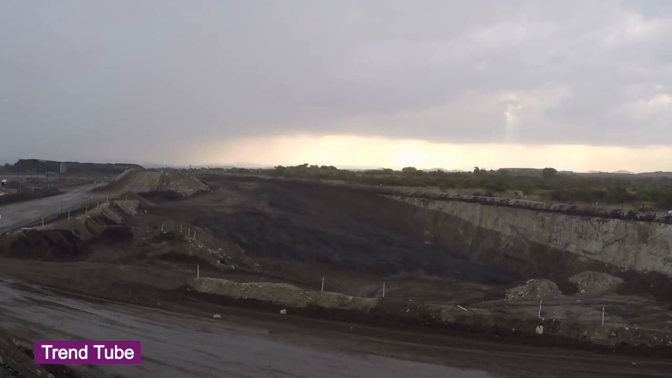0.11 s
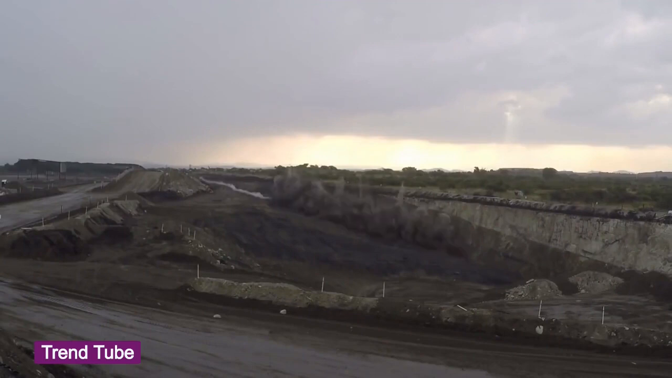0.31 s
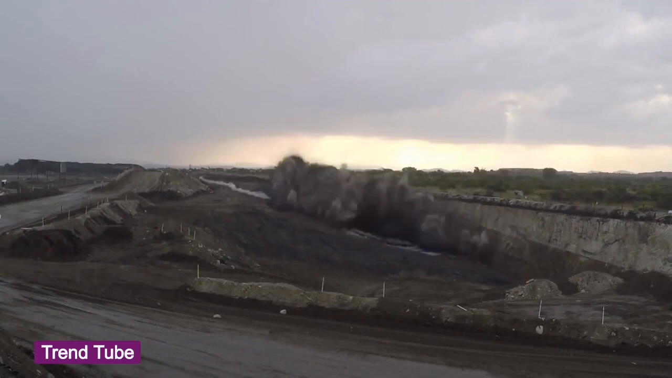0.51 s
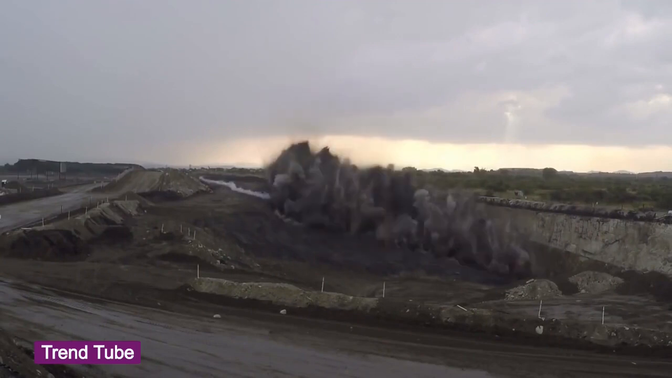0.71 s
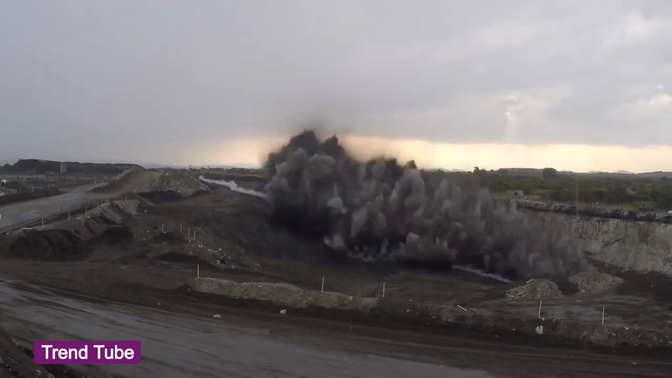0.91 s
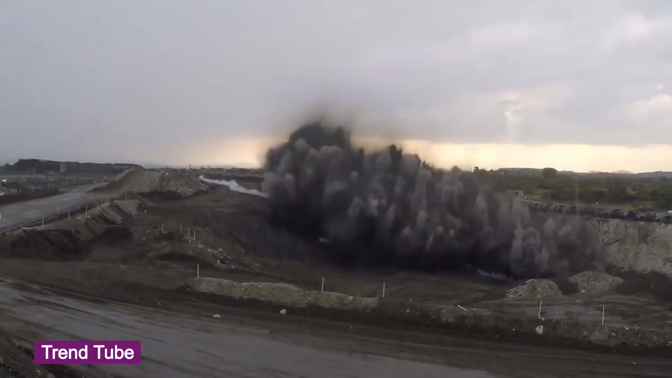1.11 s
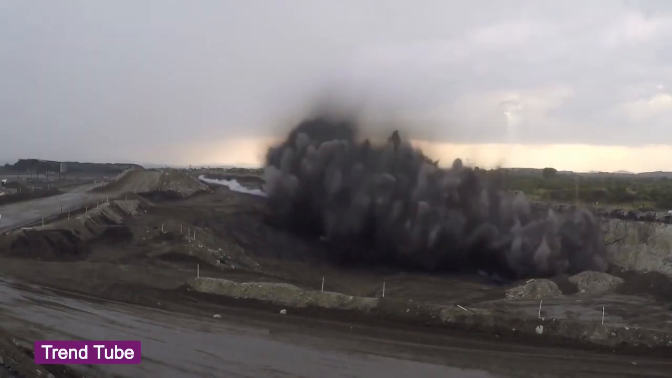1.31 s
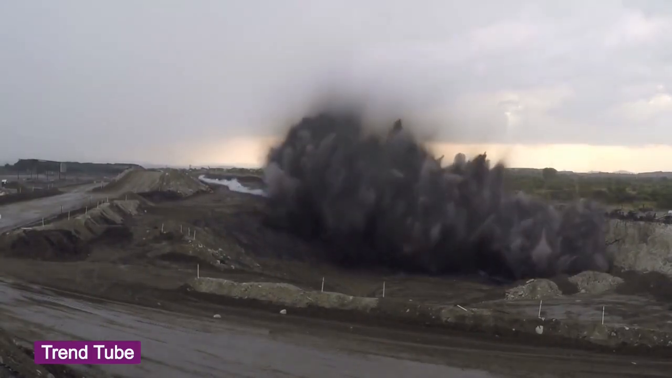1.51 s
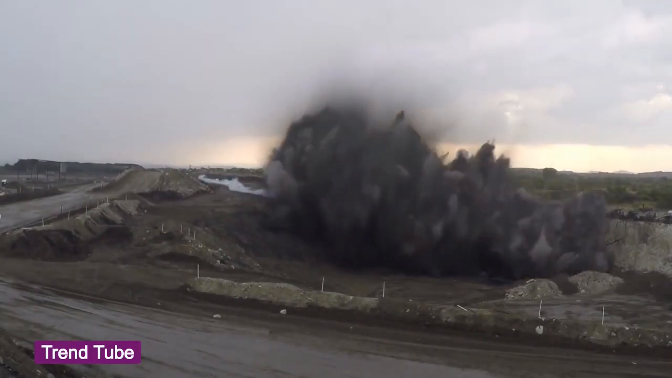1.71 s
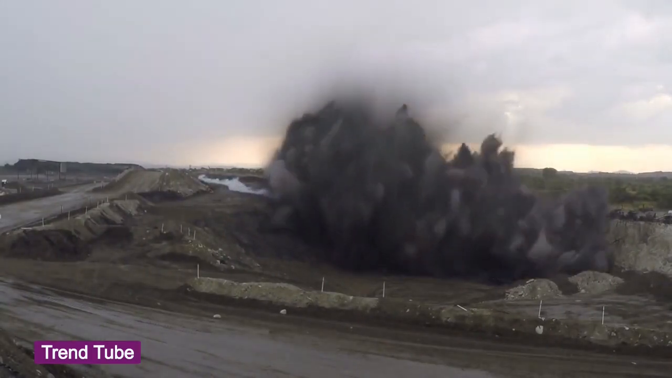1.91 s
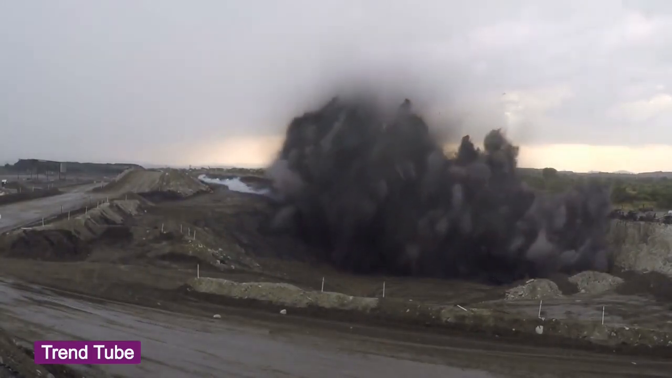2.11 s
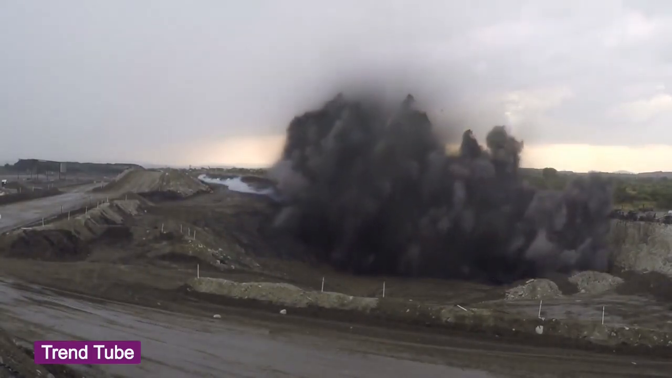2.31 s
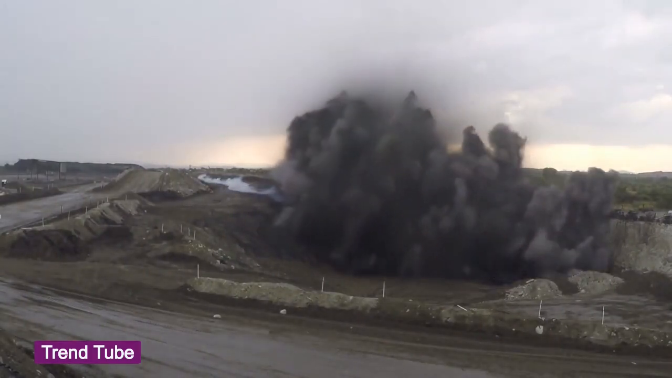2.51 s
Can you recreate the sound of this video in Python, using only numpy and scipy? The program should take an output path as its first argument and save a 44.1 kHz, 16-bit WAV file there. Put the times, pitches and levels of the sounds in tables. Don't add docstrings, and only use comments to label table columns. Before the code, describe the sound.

Quarry blast: one close overloaded boom, then a distant string of rapid cracks echoing off pit walls

```python
import sys
import numpy as np
from scipy import signal
from scipy.fft import rfft, irfft
from scipy.io import wavfile
from scipy.ndimage import uniform_filter1d

SR = 44100
rng = np.random.default_rng(int(sys.argv[2]) if len(sys.argv) > 2 else 0)


def rack_gain(trim_db):
    fader = np.asarray(trim_db, float)
    return 10 ** (fader / 20)


def output_pcm(signal):
    pcm = np.clip(np.atleast_2d(signal).T, -1, 1) * 32767
    wavfile.write(sys.argv[1], SR, np.round(pcm).astype(np.int16))


N = 114660
CHANGE_S = 0.4462
WAKE_S = 0.93

# [Hz, dB per Hz]
YARD_SPECTRUM = [(18, -34), (30, 0.5), (75, -9), (221, -8), (280, -19.5), (345, -2.5), (889, -3),
                 (6900, -19.5), (16000, -38)]
# [s, dB, dB, dB]
CLOSE_LEVELS = [
    (.205, -55.5, -59, -67.5),
    (.2325, -43, -34, -40),
    (.2338, 8.5, -3, -26.5),
    (.27, -10.5, -5.5, -15),
    (.31, -12.5, -15, -9.5),
    (.36, -30, -19.5, -30),
    (.40, -38.5, -21, -29),
    (.446, -40.5, -26, -25.5),
]
# [Hz, dB]
BOOM_SPECTRUM = [(60, -20.5), (170, -19), (270, 1.5), (400, 7.5), (550, -10), (750, -2.5), (1200, -7.5),
                 (4000, -39)]
# [Hz, dB per Hz]
ROAR_SPECTRUM = [(59, -64), (100, -56.5), (662, -2.5), (1170, -10.5), (1830, -5.5), (7610, -19.5),
                 (11400, -32.5), (16000, -71)]
# [Hz, dB]
HISS_SPECTRUM = [(1000, -35.5), (3000, 6), (5000, 3), (8000, 1.5), (12000, -15.5), (16000, -21)]

# [s, dB]
GROUND_LEVELS = [(.5, -49), (.535, -33), (.56, -28.5), (.76, -33.5), (.9, -36.5), (.95, -26.5),
                 (1.4, -35.5), (1.62, -45.5), (1.95, -48), (2.2, -54.5), (2.6, -57.5)]
# [Hz, dB]
SWAY_SPECTRUM = [(10, 3), (25, -1), (50, -1), (80, -10), (105, -20), (200, -34), (400, -74)]
# [s, dB, Hz, s]
GROUND_PACKETS = [(0.534, -20, 73.9, 0.045), (0.551, -25.5, 41.44, 0.049), (0.634, -28.5, 59.36, 0.021),
                  (0.691, -28, 56.55, .035), (0.924, -18, 49.9, 0.026), (1.04, -24.5, 56.8, 0.024),
                  (1.139, -26, 51.2, 0.074), (1.249, -24, 54.3, 0.059), (1.361, -27.5, 56, 0.02),
                  (1.452, -24.5, 55.8, 0.0095), (1.551, -35, 53.7, 0.035), (1.839, -40.5, 42.3, 0.015),
                  (1.951, -40, 38.9, 0.02)]
# [Hz, dB]
BUZZ_SPECTRUM = [(200, -2), (340, 8), (600, 2.5), (1900, -12), (4000, -48)]
# [Hz, dB]
AIR_SPECTRUM = [(60, -23.5), (100, -11), (430, -19.5), (1200, -24.5), (3000, -30), (7000, -39),
                (16000, -53.5)]

# [s, dB]
CHARGES = [(0.9322, -13), (0.9374, -13), (0.9471, -18), (0.9535, -15), (0.961, -32), (0.9675, -33.5),
           (0.9734, -19), (0.977, -30), (0.9884, -18.5), (1.0013, -28.5), (1.0046, -20),
           (1.0096, -17), (1.0126, -21), (1.0163, -30), (1.031, -27), (1.0328, -32.5), (1.0532, -28),
           (1.0568, -27), (1.0649, -24), (1.069, -18.5), (1.076, -34.5), (1.081, -43),
           (1.1116, -22.5), (1.1143, -28), (1.1192, -27.5), (1.1286, -22.5), (1.1368, -34.5),
           (1.145, -21.5), (1.1475, -35), (1.1518, -35.5),
           (1.1713, -25.5), (1.1892, -25.5), (1.205, -23), (1.2113, -30), (1.2266, -36), (1.23, -25),
                (1.2565, -29), (1.2587, -32), (1.2629, -21), (1.2677, -26), (1.2814, -33.5),
                (1.3015, -29.5), (1.3048, -45.5), (1.3043, -31.5), (1.3184, -31.5), (1.3241, -24),
                (1.3275, -27), (1.338, -18.5), (1.3612, -33), (1.3727, -24.5), (1.3795, -18.5),
                (1.3956, -23), (1.3996, -37), (1.42, -32), (1.4395, -27.5), (1.4526, -23)]
# [Hz, s]
PIT_DECAY = [(100, 1.5), (1000, 0.82), (2500, 1.36), (6000, 0.91), (10000, 1.1)]
# [Hz, dB per Hz]
PIT_SPECTRUM = [(60, -48), (100, -15), (660, -15.5), (1000, -17), (1200, -27), (2500, -29), (6000, -36),
                (16000, -66)]

# [Hz, dB, s]
HOUSING_MODES = [(764, -9, 0.0089), (1057, -5, .012), (1426, -10, 0.016), (1900, -2.5, 0.0092),
                 (2134, -14, 0.0087), (2592, -5, 0.014), (2816, -1, 0.012), (3637, -3.5, 0.012),
                 (4180, -7, .013), (4650, -8, 0.012), (5557, -8.5, 0.0073), (6940, -10.5, 0.0075),
                 (8660, -21.5, 0.0078)]
# [Hz, dB, s]
LINGERING_MODES = [(1841, -29.5, 0.058), (2684, -25, 0.041), (3630, -35, .037)]
# [Hz, Hz, dB]
HOUSING_BANDS = [(1900, 130, 0), (2750, 200, 3), (3680, 130, 0), (4600, 200, -6), (5700, 170, -2)]
# [s,
# dB, Hz]
TICKS = [(0.161, -26.5, 9100), (0.165, -33.5, 6530), (0.4594, -23.5, 1680), (0.4699, -19, 1490),
         (0.4728, -19, 1570), (0.4738, -27, 2480), (0.501, -53.5, 1800), (0.5324, -44.5, 1500),
         (0.5367, -36.5, 1500), (0.598, -54.5, 1640), (0.608, -50, 1520), (0.6228, -48.5, 3425),
         (.651, -51, 1417), (.662, -59, 1092), (.699, -62, 1900), (0.52, -72, 2500),
         (0.727, -47.5, 998), (0.7488, -8, 3100), (0.83, -42.5, 1290), (0.848, -61, 1590),
         (0.893, -62, 1675),
         (1.506, -38, 2675), (1.529, -39, 3900), (1.551, -40.5, 4470), (1.597, -40, 1280),
              (1.768, -58.5, 2425), (1.802, -38.5, 1890), (1.812, -44.5, 5080), (1.9711, -25, 2100),
              (2.025, -44, 1975), (2.121, -52, 5000), (2.194, -47, 2780), (2.244, -39.5, 1900),
              (2.299, -46.5, 2025), (2.309, -29.5, 1760), (2.337, -45, 1080), (2.4205, -20.5, 2470),
              (2.528, -35, 2296)]
# [s, dB, Hz]
STAND_CREAKS = [
    (.655, -52, 540),
    (.858, -53, 545),
    (2.385, -62, 540),
]
# [Hz, dB]
SIDE_LEVELS = [(30, -28), (70, -32), (140, -24), (300, -35), (1000, -32), (2000, -38), (5000, -26),
               (12000, -19)]


def evened(x):
    return x / np.sqrt(np.mean(x ** 2) + 1e-20)


def read(points, hz):
    f, value = np.transpose(points)
    return np.interp(np.log(hz + 1), np.log(f + 1), value)


def curve(table, column):
    rows = np.transpose(table)
    return np.interp(np.arange(N) / SR, rows[0], rows[column])


def add(mix, s, sound):
    part = mix[round(s * SR):][:len(sound)]
    part += sound[:len(part)]


def coloured(x, spectrum):
    hz = np.fft.rfftfreq(len(x), 1 / SR)
    return irfft(rfft(x) * rack_gain(read(spectrum, hz)), len(x))


def banded(x):
    hz = np.fft.rfftfreq(len(x), 1 / SR)
    lift = sum(rack_gain(db + 9.0) / (1 + ((hz - f) / half_width) ** 2) for f, half_width, db in HOUSING_BANDS)
    return irfft(rfft(x) * (1 + lift), len(x))


def noise(spectrum, patchy_db):
    frames = N // 128 + 5
    patches = rng.standard_normal((257, frames))
    patches = uniform_filter1d(patches, size=8, axis=0)
    patches = evened(uniform_filter1d(patches, size=10, axis=1))
    z = signal.stft(rng.standard_normal(N + 512), nperseg=512, noverlap=384)[2][:, :frames]
    z = z * rack_gain(patchy_db * patches[:, :z.shape[1]])
    patchy = signal.istft(z, nperseg=512, noverlap=384)[1][:N]
    return evened(coloured(patchy, spectrum))


def knock(db, centre_hz):
    t = np.arange(2600) / SR
    focus_db, contact_s = 4.5, 0.0004
    snap_db, snap_s, snap_top = -13, 0.001, 2.5
    hz, mode_db, t60 = np.transpose(HOUSING_MODES + LINGERING_MODES)[:, :, None]
    luck = rng.standard_normal((3, len(hz), 1))
    level_db = mode_db - focus_db * np.log2(hz / centre_hz) ** 2 + 1.1 * luck[0] - 60 * t / t60
    phase = 2 * np.pi * hz * (1 + 0.021 * luck[1]) * t + np.pi * luck[2]
    ring = (rack_gain(level_db) * np.sin(phase)).sum(0)
    ring = ring * (1 - np.exp(-(t / contact_s) ** 2))

    f = np.fft.rfftfreq(len(t), 1 / SR) + 1
    response = (f / (f + centre_hz)) ** 3 / (1 + (f / centre_hz / snap_top) ** 4)
    snap = evened(irfft(rfft(rng.standard_normal(len(t))) * response, len(t)))
    snap_envelope = (1 - np.exp(-t / 0.000067)) * np.exp(-t / snap_s)
    crack = ring / abs(ring).max() + rack_gain(snap_db) * snap_envelope * snap
    return rack_gain(db - 2) * crack


def quiet():
    t = np.arange(N) / SR
    early = t < WAKE_S
    air = rack_gain(-72 - 7.0 * early) * evened(banded(noise(AIR_SPECTRUM, patchy_db=-1.5)))
    buzz = rack_gain(-31.5 + curve(GROUND_LEVELS, column=1)) * early * noise(BUZZ_SPECTRUM, patchy_db=4.0)
    return (t > CHANGE_S) * (air + buzz)


def rattles():
    out = np.zeros(N)
    t = np.arange(4000) / SR
    creak_t60_s, creak_rise_s = 0.099, 0.0013
    for s, db, hz in TICKS:
        add(out, s, knock(db, hz))
    for s, db, hz in STAND_CREAKS:
        envelope = rack_gain(db - 60 * t / creak_t60_s) * np.minimum(t / creak_rise_s, 1)
        add(out, s, envelope * np.sin(2 * np.pi * hz * t))
    return out


def ground():
    sway = evened(coloured(rng.standard_normal(N), SWAY_SPECTRUM))
    out = rack_gain(curve(GROUND_LEVELS, column=1)) * sway * (np.arange(N) > CHANGE_S * SR)
    t = np.arange(SR // 2) / SR
    for s, db, hz, rise_s in GROUND_PACKETS:
        u = t / rise_s
        envelope = u ** 2 * np.exp(2 - 2 * u)
        add(out, s, -rack_gain(db) * envelope * np.sin(2 * np.pi * hz * t))
    return out


def scatter():
    out = np.zeros(N)
    start_s, end_s = 0.935, 1.2
    for at, size, tint in rng.random((160, 3)):
        db = -54 - 4.0 * np.log(size + 0.0058) - 4.7 * at
        add(out, start_s + at * (end_s - start_s), knock(db, centre_hz=2000 * 2 ** (0.33 * tint)))
    return out


def pit_echo(clicks):
    raw = banded(coloured(rng.standard_normal(2 * SR), PIT_SPECTRUM))
    hz, t, z = signal.stft(raw, SR, nperseg=256)
    decay = rack_gain(-60 * t / read(PIT_DECAY, hz)[:, None])
    tail = signal.istft(z * decay, SR, nperseg=256)[1]
    return rack_gain(7) * signal.fftconvolve(clicks, tail / np.linalg.norm(tail))[:N]


def charges():
    out, clicks = np.zeros(N), np.zeros(N)
    t = np.arange(2600) / SR
    u, v = t / 0.0016, t / 0.00041
    push = 4 * u * (1 - u / 2) * np.exp(-u)
    dip = 3 * v * np.exp(-v)
    pressure = rack_gain(-1.5) * (push - rack_gain(1) * dip)
    lag_s = 0.00005
    for s, db in CHARGES:
        centre_hz = 3300 * 2 ** (0.1 * rng.standard_normal())
        add(out, s + lag_s, knock(db + 3.5, centre_hz) + rack_gain(db) * pressure)
        add(clicks, s + lag_s, rack_gain([db]))
    return out + scatter() + pit_echo(clicks)


def close_blast():
    ceiling, knee = 0.23, 2.2
    drive = rack_gain(-41.5) * noise(YARD_SPECTRUM, patchy_db=2.5)
    for k, spectrum in enumerate((BOOM_SPECTRUM, ROAR_SPECTRUM, HISS_SPECTRUM)):
        drive = drive + rack_gain(curve(CLOSE_LEVELS, column=k + 1)) * noise(spectrum, patchy_db=0.0)
    u = np.arange(2000) / SR / 0.0017
    add(drive, 0.2336, rack_gain(-1) * (1 - u) * np.exp(-u))
    flat = drive / (1 + abs(drive / ceiling) ** (2 * knee)) ** (0.5 / knee)
    flat = flat + 0.25 * signal.lfilter(*signal.butter(1, 253, "high", fs=SR), flat)
    after = np.arange(N) / SR - CHANGE_S
    return flat * np.where(after < 0, 1, rack_gain(-28.5 - 2700 * after))


def scene():
    far = quiet() + rattles() + ground() + charges()
    far_ceiling = 0.19
    mid = close_blast() + np.clip(far, -far_ceiling, far_ceiling)
    side = coloured(signal.hilbert(mid).imag, SIDE_LEVELS)
    return np.array([mid + side, mid - side])


def roll_off(x):
    return signal.sosfilt(signal.butter(12, 16830, fs=SR, output="sos"), x)


def record(dry):
    low_cut = signal.butter(1, 3.1, "high", fs=SR, output="sos")
    treble_cut = signal.firwin(255, 15900, window=("kaiser", 8), fs=SR)
    mix = signal.sosfilt(low_cut, dry)
    mix = signal.oaconvolve(mix, treble_cut[None], "same")
    return roll_off(mix)


dry = scene()
out = record(dry)
output_pcm(out)
```